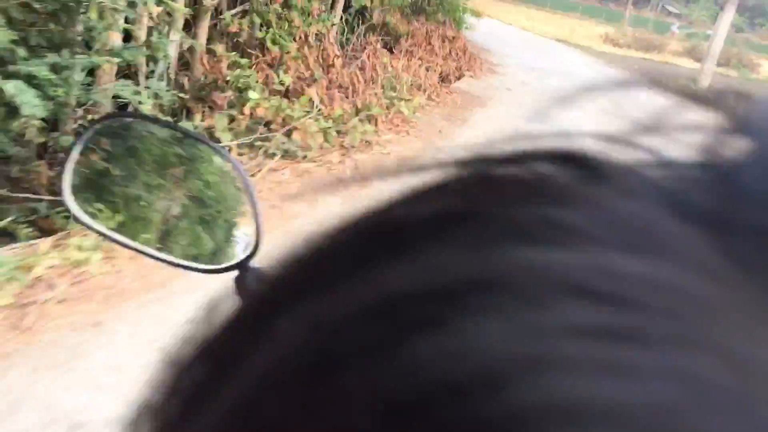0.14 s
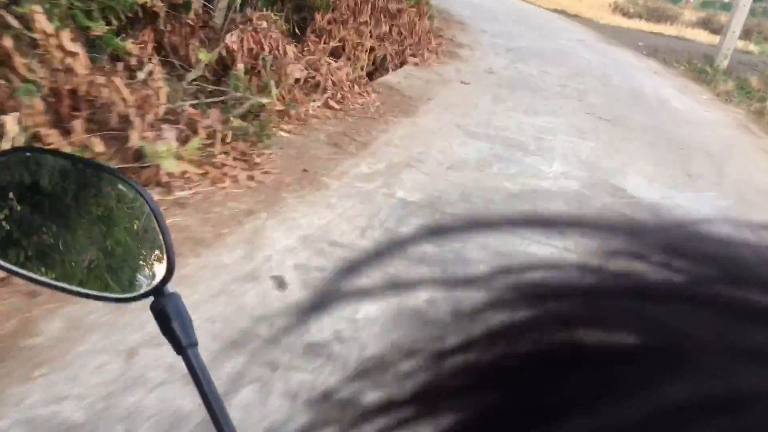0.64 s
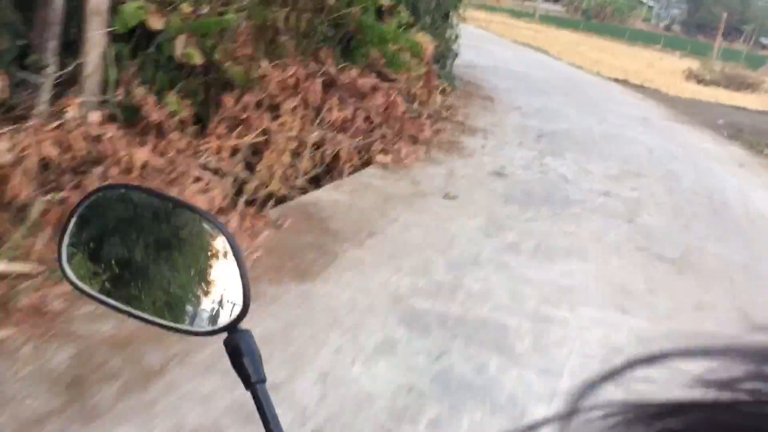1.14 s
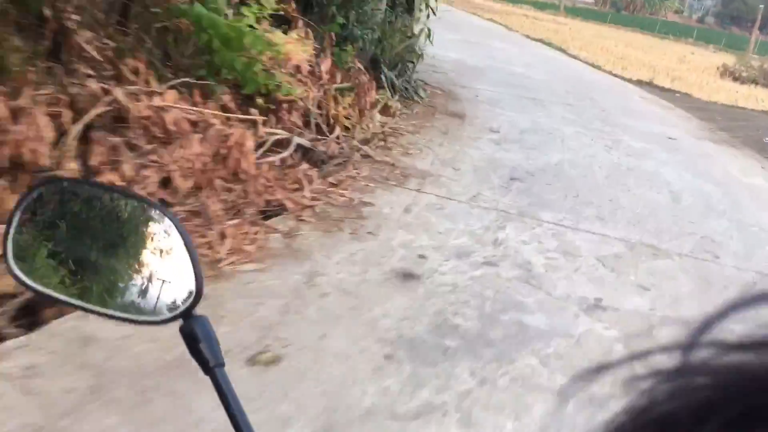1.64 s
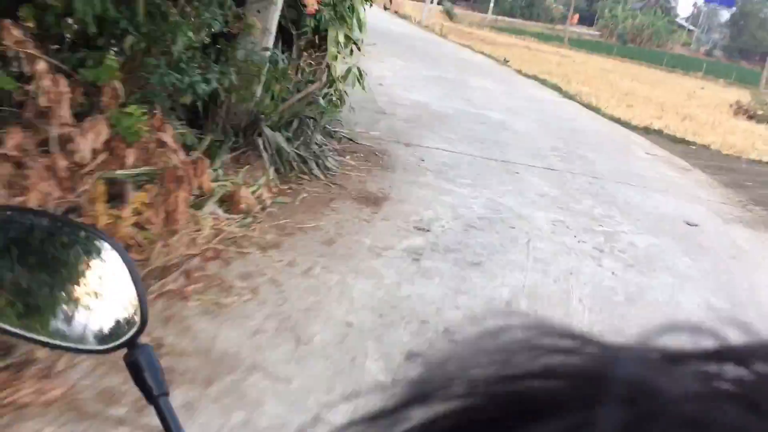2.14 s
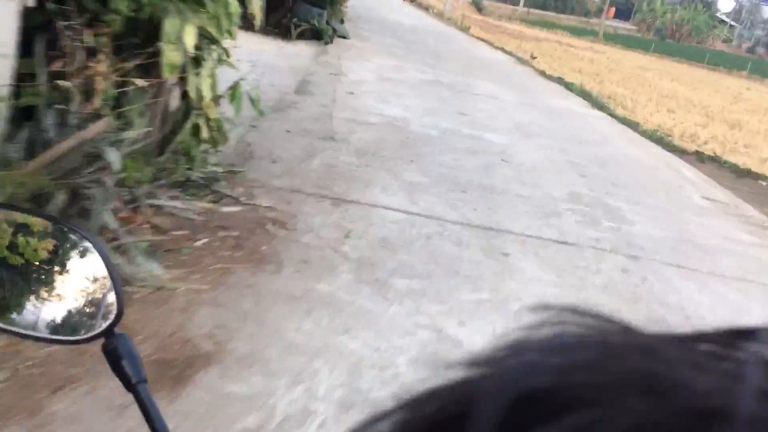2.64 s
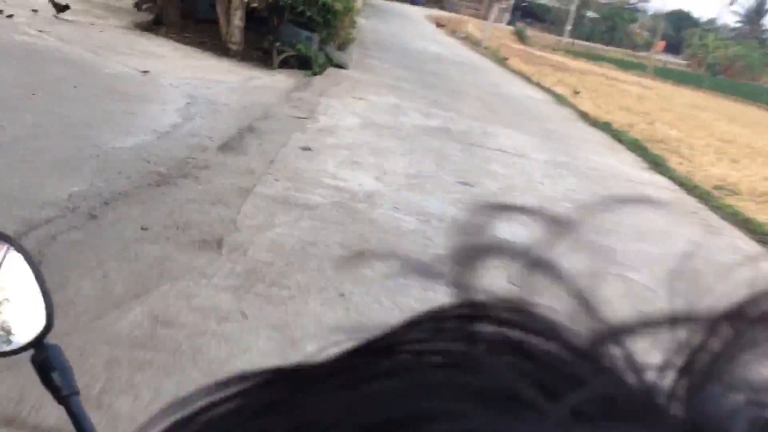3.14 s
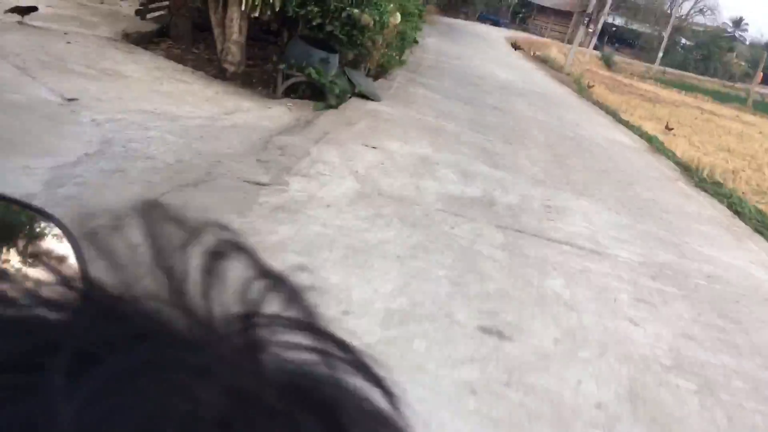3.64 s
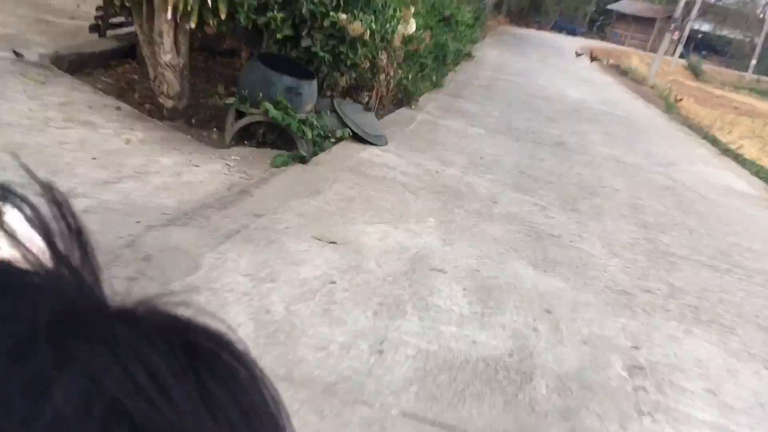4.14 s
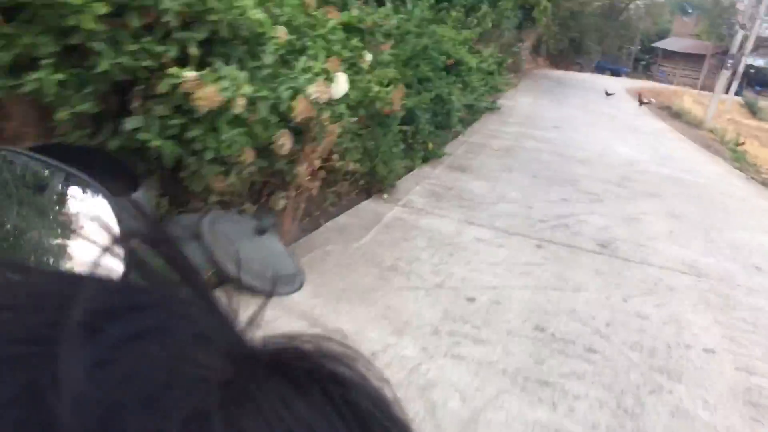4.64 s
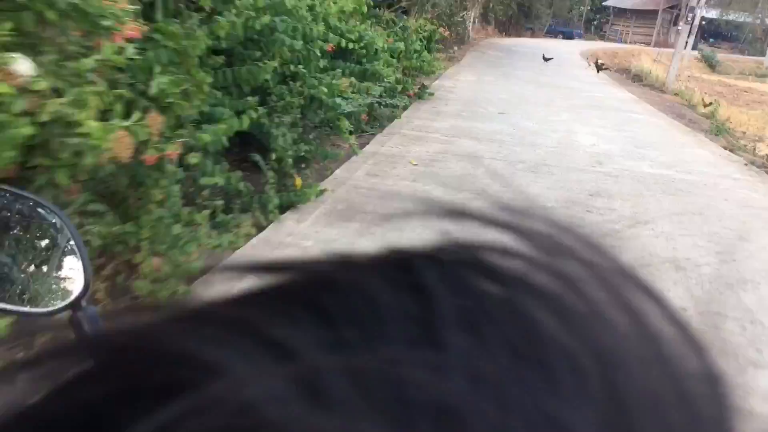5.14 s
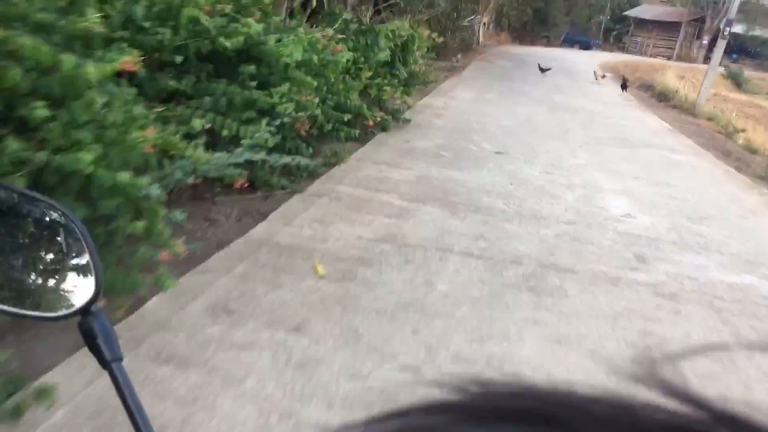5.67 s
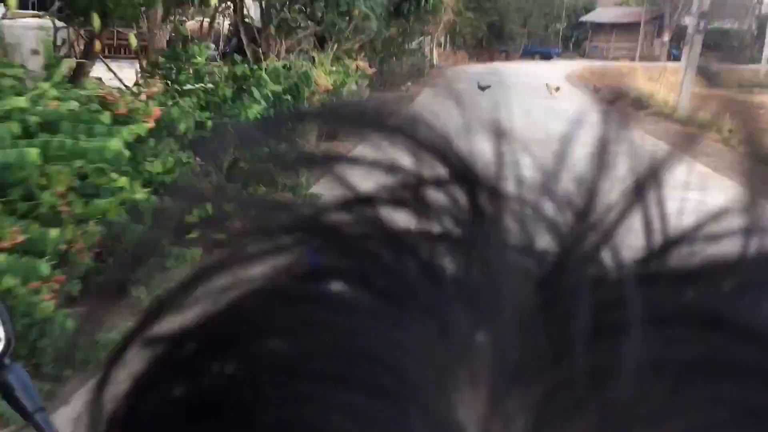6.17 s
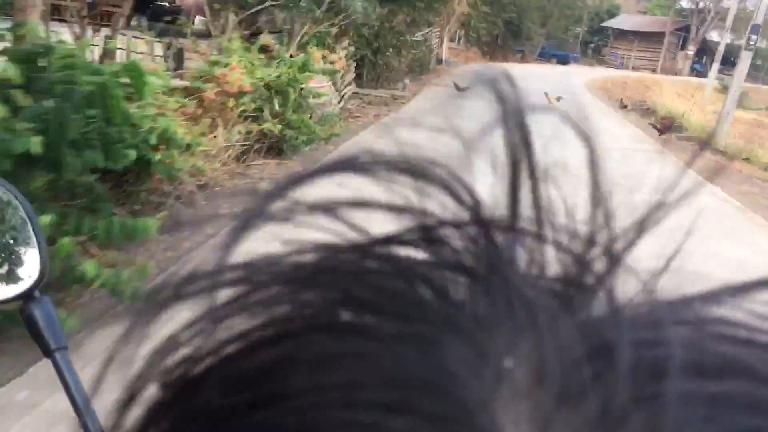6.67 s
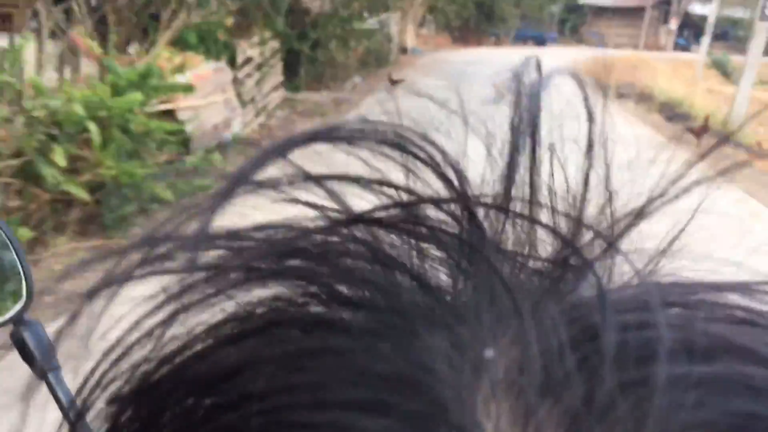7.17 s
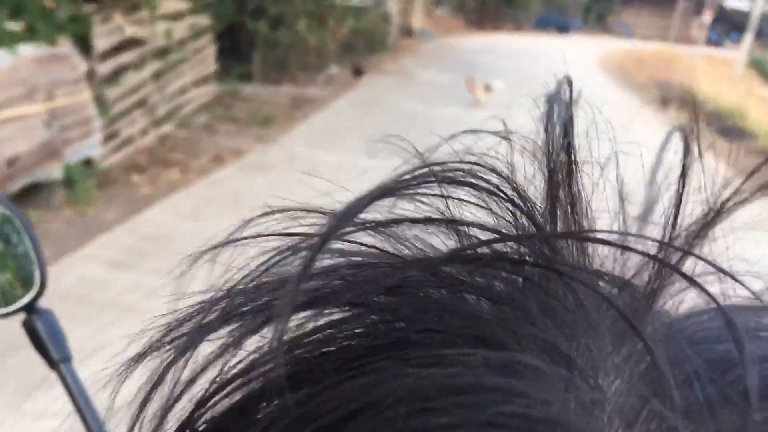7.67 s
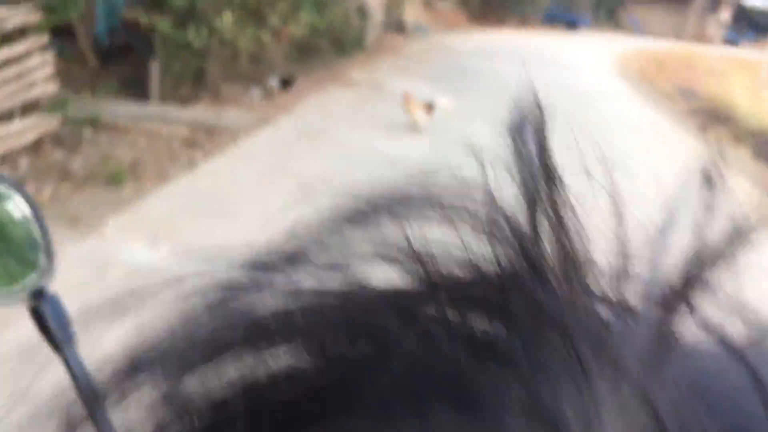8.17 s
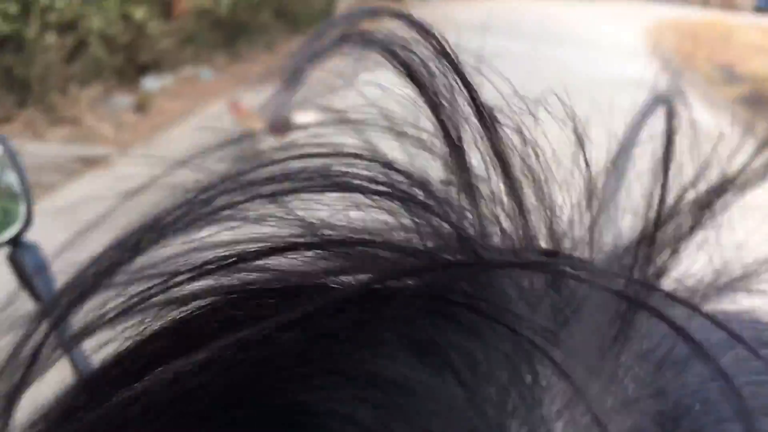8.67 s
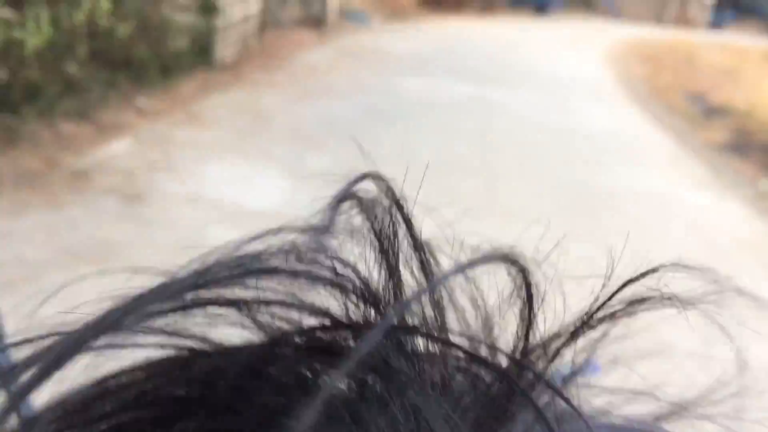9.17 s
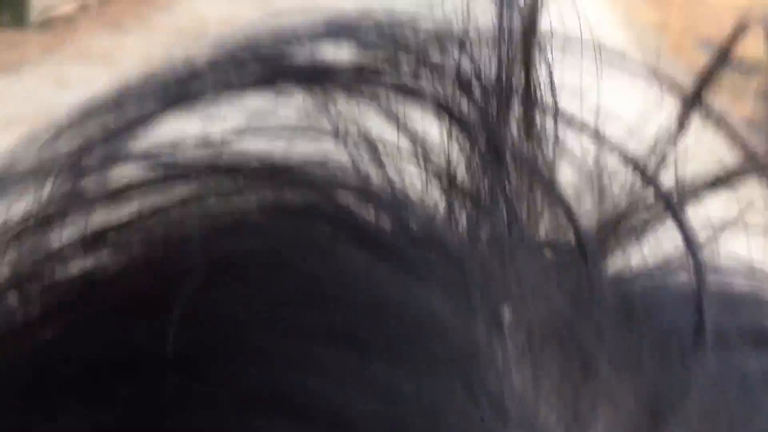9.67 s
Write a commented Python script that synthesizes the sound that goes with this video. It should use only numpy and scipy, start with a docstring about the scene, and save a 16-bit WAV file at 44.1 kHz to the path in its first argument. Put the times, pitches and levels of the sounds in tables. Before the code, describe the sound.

A close outdoor ride on a rural concrete lane: a soft, bassy single-cylinder putter runs throughout over rough airy hiss. Low wind flutters on the microphone, strong at first, calmer, then gusty again. Metallic ticks cluster between three and five seconds, scattered grit clacks follow, and thin raspy bird whistles appear in the last third. The engine never stops or revs.

```python
"""On a concrete lane beside a hedge, a small single-cylinder four-stroke motorcycle rolls slowly, heard
from the saddle. The exhaust is a sum of harmonics of the firing rate; gear and vane whine follows the crank.
Tyre and engine hiss is shaped noise thrown back by the hedge; a loose part and a grit-struck mudguard
ring as decaying modes. Wind is band-limited noise at the microphone; small birds are gliding tones."""
import sys
import numpy as np
from scipy import signal
from scipy.io import wavfile
from scipy.ndimage import uniform_filter1d

SR = 44100
rng = np.random.default_rng(int(sys.argv[2]) if len(sys.argv) > 2 else 0)


def bounce(signal):
    """Save signal as a 16-bit WAV file at the path given by the first command-line argument."""
    frames = np.transpose(np.atleast_2d(signal))
    limited = np.clip(frames, -1, 1)
    pcm = np.round(limited * 32767).astype(np.int16)
    wavfile.write(sys.argv[1], SR, pcm)


def attenuation_scalar(level_db):
    """Turn a level in dB into a linear amplitude multiplier (20 dB per decade)."""
    decades = np.asarray(level_db, float) / 20
    return 10 ** decades


N = 432621
TIME = np.arange(N) / SR
MEAN_FIRING_HZ = 32  # reference rate for the speed-dependent levels


def curve(rows):
    """Linear interpolation: each column joined by straight lines in time."""
    s, *columns = np.transpose(rows)
    return [np.interp(TIME, s, c) for c in columns]


def humps(rows):
    """Superposition of raised-cosine humps (peak time, length, heights); one sum for each height column."""
    rise = 0.4  # share of the length spent before the peak
    s, length, *heights = np.transpose(rows)
    t = np.arange(0, N / SR + 0.01, 0.005)
    u = t[:, None] - s
    u = np.where(u < 0, u / rise, u / (1 - rise)) / length
    shape = np.cos(np.pi / 2 * np.clip(u, -1, 1)) ** 2
    return [np.interp(TIME, t, shape @ h) for h in heights]


def evened(x):
    """Normalisation to unit rms."""
    return x / np.sqrt(np.mean(x ** 2) + 1e-20)


def add(mix, s, sound):
    """Superposition: mixes a sound in at s seconds."""
    part = mix[round(s * SR):][:len(sound)]
    part += sound[:len(part)]


def band(x, lo_hz, hi_hz):
    """Band-pass filtering by a Butterworth response."""
    return signal.sosfilt(signal.butter(2, [lo_hz, hi_hz], "bandpass", fs=SR, output="sos"), x)


def beat(cycles, at, depth_db, count):
    """Amplitude modulation: a swell that returns count times in each engine cycle."""
    return attenuation_scalar(depth_db * np.cos(2 * np.pi * count * (cycles - at)))


def rung(modes, soft_s):
    """Modal decay after a blow with an onset time constant of soft_s; peak 1."""
    t = np.arange(2000) / SR
    ring = sum(attenuation_scalar(db - 60 * t / t60) * np.sin(2 * np.pi * hz * t) for hz, db, t60 in modes)
    ring = ring * (1 - np.exp(-t / soft_s))
    return ring / abs(ring).max()


def firing_rate():
    """Engine kinematics: one firing in each four-stroke cycle of two crank turns; returns firings per s."""
    # engine speed: t/s, firing rate f/Hz
    speed = [(0.0, 30.231), (0.6, 31.337), (1.6, 31.668), (1.8, 31.565), (2.6, 31.812), (3.0, 32.089),
             (4.0, 32.475), (4.6, 32.54), (5.0, 32.037), (5.8, 32.762), (6.2, 32.122), (6.6, 32.374),
             (7.4, 31.952), (7.8, 32.055), (8.2, 31.326), (8.4, 31.701), (9.0, 30.917), (9.81, 31.482)]
    return curve(speed)[0]


def exhaust(cycles, firing_hz):
    """Fourier synthesis of firing orders; the pipe lets high ones out first, so each throb sweeps downward."""
    # deep thump, throb, its edge and the silencer's ring: multiple of the firing rate, relative level/dB
    thump_orders = [(1, -21.5), (2, -2.5), (3, -6)]
    throb_orders = [(4, -2), (5, -3.5)]
    edge_orders = [(6, -0.43), (7, -22.5)]
    ring_orders = [(8, -46.5), (9, -46), (10, -42.5), (11, -41.5), (12, -42.5), (13, -47.5), (14, -78.5)]
    # the bass dips briefly: deepest t/s, length/s, thump level change/dB, throb level change/dB
    dips = [(.17, 0.33, -17, -5), (.64, 0.24, -8, -1), (1.2, 0.18, -2, 0), (4.97, 0.65, -6, -.5),
            (6.3, 0.3, -5, 0.5), (6.59, 0.22, -1, -2), (7.0, 0.3, -20, -4.5), (7.33, 0.23, -14, -1),
            (7.61, 0.34, -8, 0.5), (7.96, 0.16, -9, -3.5), (8.2, .18, -1, -2), (8.93, 0.34, -15, -5),
            (9.18, 0.12, -9, -4.5), (9.38, 0.29, -22, -6.5)]
    thump_loss, throb_loss = humps(dips)
    thump_db, throb_db = -23 + thump_loss, -23.5 + throb_loss
    # the edge, relative to the throb, follows 0.42 of its dips and softens as the firing rate rises
    edge_db = -32 + 23.5 - (1 - 0.42) * throb_loss - 1.5 * (firing_hz - MEAN_FIRING_HZ)

    # each burn has its own strength, timing and ring
    whole = np.arange(cycles[-1] + 2)
    draws = rng.standard_normal((len(whole), 3)).T
    strength, slip, ringing = (np.interp(cycles - 0.3, whole, v) for v in draws)
    turn = 2 * np.pi * (cycles + 0.0045 * slip)

    def swept(orders):
        """Phase dispersion: a phase quadratic in order, so the higher orders arrive earlier."""
        return sum(attenuation_scalar(db) * np.cos(k * turn + 0.35 * (k - 2.6) ** 2 - 0.15) for k, db in orders)

    thump = attenuation_scalar(thump_db + 0.6 * strength) * swept(thump_orders)
    throb = attenuation_scalar(throb_db + 0.37 * strength) * (swept(throb_orders) + attenuation_scalar(edge_db) * swept(edge_orders))
    ring = sum(attenuation_scalar(db) * np.cos(k * turn + 3.9 + 1.75 * (k - 11)) for k, db in ring_orders)
    ring = ring * attenuation_scalar(throb_loss + 2.1 * strength + ringing)
    return np.sqrt(2) * (thump + throb + ring)


def whine(cycles):
    """Order-locked tones: teeth and vanes whine at multiples of the firing rate, each wavering on its own."""
    # multiples of the firing rate
    orders = [16, 17, 20, 24, 34, 36]
    # each order: mid-ride level/dB, drift/(dB per s)
    order_levels = [(-61, -0.5), (-58, 0.9), (-55, 0.8), (-54.5, 0.37), (-53, -0.7), (-53.5, 0)]
    waver = rng.standard_normal((len(orders), N // 1000 + 2))
    waver = evened(uniform_filter1d(waver, 7, 1))
    out = np.zeros(N)
    for k, (db, drift), w in zip(orders, order_levels, waver):
        w = np.interp(TIME, np.arange(len(w)) * 1000 / SR, w)
        level_db = db + drift * (TIME - TIME.mean()) + 4 * w
        phase = 2 * np.pi * (k * cycles + 0.12 * w + rng.random())
        out += attenuation_scalar(level_db) * np.sqrt(2) * np.sin(phase)
    return out


def hiss(cycles, firing_hz):
    """Spectrally shaped noise; the lowest band puffs with each firing, the treble with each crank turn."""
    # spectrum of engine and tyre noise: f/Hz, relative density level/dB
    spectrum = [(30, -27), (150, -11), (240, -5.5), (500, -4.5), (720, -9.5), (870, -18), (1300, -11.5),
                (1900, -20), (3000, -24), (4400, -27), (5000, -32.5), (6000, -31.5), (7600, -39.5),
                (9000, -37), (10400, -42), (12000, -40), (15700, -47)]
    # its resonances: centre f/Hz, width/Hz, rise level/dB
    resonances = [(346.3, 31, 8.74), (980, 150, 4.7), (1685, 240, 3.2), (2376, 89, 3.5), (800, 13, 0.5)]
    # treble returned by the hedge, weighted below for each layer: t/s, relative level/dB
    hedge_return = [(0, -1), (1.2, 0), (3.1, 3), (3.45, -2), (4.05, -3), (4.42, -4.5), (4.83, 2), (5.4, 4),
                    (6.32, 1.5), (6.69, 3.5), (7.58, -2), (8.32, 1.5), (8.5, 0), (9.25, 1), (9.5, 0.5),
                    (9.81, -1)]
    frames, hz = N // 256 + 5, np.fft.rfftfreq(1024, 1 / SR)
    real, imaginary, patches = rng.standard_normal((frames, 513, 3)).T
    patches = uniform_filter1d(patches, 14, 0)  # along frequency
    patches = evened(uniform_filter1d(patches, 10, 1))  # along time
    f, db = np.transpose(spectrum)
    colour = np.interp(np.log(hz + 1), np.log(f), db)
    colour = colour + sum(d / (1 + ((hz - c) / w * 2) ** 2) for c, w, d in resonances)
    z = (real + 1j * imaginary) * attenuation_scalar(colour[:, None] + 0.98 * patches)

    def layer(lo_hz, hi_hz):
        """Inverse Fourier synthesis of one frequency band."""
        inside = (hz >= lo_hz) & (hz < hi_hz)
        return signal.istft(z * inside[:, None], nperseg=1024, noverlap=768)[1][:N]

    z /= np.sqrt(np.mean(layer(450, 1800) ** 2))
    puff, drone, body = layer(0, 450), layer(450, 900), layer(900, 1800)
    upper, top = layer(1800, 5000), layer(5000, SR)
    body = body + drone * attenuation_scalar(1.5 * (firing_hz - MEAN_FIRING_HZ))  # the drone grows with the firing rate
    hedge_db = curve(hedge_return)[0]
    flutter = evened(band(rng.standard_normal(N), 3.4, 10.8))  # uneven concrete shakes the treble
    treble = upper * attenuation_scalar(0.22 * hedge_db) + top * attenuation_scalar(0.79 * hedge_db)
    treble *= beat(cycles, 0.26, 0.93, count=2) * attenuation_scalar(0.55 * flutter)
    puff = puff * beat(cycles, 0.85, 0.57, count=1)
    body = body * beat(cycles, 0.31, 0.26, count=2)
    return attenuation_scalar(-36.5) * (puff + body + treble)


def loose_part(cycles):
    """Impulse excitation of modes: hard ticks, and weaker ones that every crank turn shakes out unevenly."""
    # hard ticks: t/s, peak level/dB
    ticks = [(2.4488, -26), (3.0928, -26), (3.3043, -29), (3.3717, -28), (3.435, -26.5), (3.5896, -27),
             (3.8535, -25.5), (4.0077, -25), (4.0197, -24), (4.0511, -27), (4.0975, -25), (4.127, -25),
             (4.145, -24), (4.2217, -29), (4.3295, -24), (4.3609, -28), (4.515, -29), (4.62, -25),
             (4.6533, -29), (4.6977, -29), (4.7141, -25.5), (4.822, -25.5)]
    # how freely the part rattles: t/s, level/dB before the uneven shaking
    slack = [(0, -40), (2.3, -42), (3.1, -40), (3.6, -43), (4.1, -37), (4.75, -43), (5.1, -40),
             (5.6, -42.5), (9.81, -40.5)]
    # what the part rings with: f/Hz, relative level/dB, t60/s
    part_modes = [(2214, -0.5, 0.017), (2365, -3.5, 0.012), (1570, -5, 0.019), (4200, -17.5, 0.018)]
    blows = np.zeros(N)
    turns = np.flatnonzero(np.diff(np.floor(2 * (cycles - 0.27))))
    # after a hard tick the part keeps chattering, dying away
    s, db = np.transpose(ticks)
    since = TIME[turns, None] - s
    chatter = attenuation_scalar(db - 1) * np.exp(-abs(since) / 0.028) * (since > 0)
    uneven = attenuation_scalar(3.5 * rng.standard_normal(len(turns)))
    blows[turns] = np.maximum(attenuation_scalar(curve(slack)[0][turns]), chatter.max(1)) * uneven
    for s, db in ticks:
        at = round(s * SR)
        blows[at - 200:at + 200] = 0  # a hard tick replaces any other blow close to it
        blows[at] = attenuation_scalar(db)
    return signal.oaconvolve(blows, rung(part_modes, 0.0016))[:N]


def grit():
    """Impact excitation: stones crunch on the mudguard's modes and crack brightly; small ones fall at random."""
    # stones under the tyres: t/s, knock level/dB, crack level/dB
    stones = [(1.4501, -38, -53), (2.4188, -28, -51), (2.6228, -22, -37), (3.094, -26.5, -43),
              (3.9908, -26, -49), (4.6204, -25, -46), (5.673, -32, -53), (5.933, -21.5, -41),
              (5.9464, -23, -47), (7.0494, -40, -48), (8.2694, -32, -54), (8.8228, -22.5, -53),
              (8.8794, -29, -42), (8.9094, -36, -46), (8.9435, -23.5, -52), (9.1294, -42, -50),
              (9.226, -35, -43), (9.2744, -41, -43)]
    # modes of the mudguard: f/Hz, relative level/dB, t60/s
    guard_modes = [(1050, 10, 0.01), (1595, 9, 0.022), (2150, 9, 0.0094), (3160, 2.5, 0.0096),
                   (3980, -4, 0.031)]
    out, t = np.zeros(N), np.arange(1200) / SR
    noises = rng.standard_normal((len(stones), 3, len(t)))
    for (s, knock_db, crack_db), (crunch, dull, bright) in zip(stones, noises):
        crunch = np.r_[10, crunch[1:]] * attenuation_scalar(-60 * t / 0.035)  # one hard blow, then crunching
        knock = signal.oaconvolve(crunch, rung(guard_modes, 0.0002))[:len(t)]
        thud = 0.33 * attenuation_scalar(-60 * t / 0.045) * evened(band(dull, 900, 3800))
        knock = knock / abs(knock).max() + thud
        crack = attenuation_scalar(crack_db - 60 * t / 0.02) * evened(band(bright, 4500, 12000))
        add(out, s, attenuation_scalar(knock_db) * knock + crack)
    falls = rng.random(N) < 35 / SR  # about 35 small stones per s
    small = falls * attenuation_scalar(-60.5 + 4.2 * np.minimum(rng.exponential(1, N), 3))
    small = signal.lfilter([1], [1, -np.exp(-1 / (0.00092 * SR))], small)  # decay time constant 0.92 ms
    return out + band(small * rng.standard_normal(N), 900, 7000)


def wind(cycles):
    """Band-limited lumpy noise at the microphone; its upper layer swells once in each engine cycle."""
    # wind before gusts and sway: t/s, level/dB
    wind_level = [(0, -35.5), (1.4, -39), (2.4, -40), (3.4, -37), (3.8, -41), (4.5, -39), (5.1, -29.5),
                  (5.9, -45), (6.2, -34.5), (7.3, -31), (7.65, -36), (8.4, -32.5), (9.0, -33.5),
                  (9.81, -34.5)]
    # stronger gusts: peak t/s, length/s, rise level/dB
    gusts = [(.07, 0.22, 16.5), (5.04, .3, 5), (6.58, .28, 8), (7.84, 0.42, 0), (8.54, .28, 4.5),
             (9.1, 0.34, 2)]
    # single gust pops: t/s, peak level/dB
    pops = [(7.224, -11.5), (8.833, -17)]
    deep, upper, lumps, *slow = rng.standard_normal((5, N))
    sway, upper_sway = (2.5 * evened(band(v, 0.67, 2.8)) for v in slow)  # slow random swings, dB
    level_db = curve(wind_level)[0] + humps(gusts)[0] + sway
    lumps_db = 5 * evened(band(lumps, 14.8, 28.6))
    deep = evened(band(band(deep, 40.5, 98.5), 41.5, 137))
    upper = band(upper, 128, 225)
    upper = evened(band(upper, 86, 215) * beat(cycles, 0.86, 4.3, count=1))
    out = attenuation_scalar(level_db + lumps_db) * (deep + attenuation_scalar(-2.5 + upper_sway) * upper)
    u = np.arange(0, 1, 1 / (0.0387 * SR))  # progress through a pop of 38.7 ms
    for s, db in pops:
        add(out, s, attenuation_scalar(db) * np.hanning(len(u)) * np.sin(2 * np.pi * 2.53 * u))
    return out


def birds():
    """Frequency modulation: raspy gliding whistles, smeared by scattered echoes off the road and fence."""
    # chirps: t/s, length/s, start f/Hz, end f/Hz, level/dB
    chirps = [(6.36, .05, 5500, 5450, -57), (6.557, 0.092, 5850, 6030, -52),
              (6.647, 0.033, 4600, 4300, -48), (6.887, 0.042, 6030, 6040, -51),
              (6.958, 0.05, 4540, 3900, -49), (7.605, 0.065, 5600, 6130, -51),
              (7.658, 0.092, 6120, 5750, -50), (7.717, 0.034, 4950, 4450, -46),
              (7.726, 0.037, 4300, 3300, -49), (8.502, .07, 5100, 3900, -51),
              (8.563, 0.051, 4630, 3250, -43), (8.69, .04, 5350, 5200, -52), (8.76, 0.025, 5300, 5100, -51),
              (8.771, 0.054, 4470, 3730, -47), (8.83, 0.036, 4310, 3400, -46), (8.987, .1, 5600, 4680, -53),
              (9.037, 0.054, 4440, 3770, -43), (9.05, .05, 5800, 5550, -56), (9.076, .08, 4500, 3740, -47),
              (9.13, .03, 3920, 3050, -46), (9.25, .03, 4400, 4280, -52), (9.3, 0.076, 5600, 5700, -59),
              (9.384, 0.038, 4270, 3860, -44), (9.518, .06, 4800, 4200, -52), (9.6, 0.11, 5430, 5650, -58),
              (9.69, .04, 5450, 5700, -56), (8.36, .03, 5350, 5300, -54), (9.691, 0.066, 4450, 3820, -47.5)]
    out = np.zeros(N)
    for s, length, start_hz, end_hz, db in chirps:
        u = np.arange(0, 1, 1 / (length * SR))
        rasp, tremor = evened(uniform_filter1d(rng.standard_normal((2, len(u))), 110, 1))
        hz = start_hz + (end_hz - start_hz) * u ** 1.2 + 85 * rasp
        envelope = attenuation_scalar(db + 0.9 * tremor) * np.sin(np.pi * u) ** 0.92
        add(out, s, envelope * np.sin(2 * np.pi * np.cumsum(hz) / SR))
    t = np.arange(4000) / SR
    sparse = rng.random(len(t)) < 0.02
    echoes = rng.standard_normal(len(t)) * sparse * attenuation_scalar(-9 - 60 * t / 0.17)
    echoes[0] = 1  # direct sound
    return signal.oaconvolve(out, echoes)[:N]


def scene():
    """Linear superposition of all sources at one microphone."""
    firing_hz = firing_rate()
    cycles = 0.39 + np.cumsum(firing_hz) / SR  # engine cycles gone by
    engine = exhaust(cycles, firing_hz) + whine(cycles) + loose_part(cycles)
    return (engine + hiss(cycles, firing_hz) + grit() + wind(cycles) + birds())[None]


def top_cut(x):
    """Nothing passes above the cut-off."""
    return signal.sosfilt(signal.butter(12, 15730, fs=SR, output="sos"), x)


def record(dry):
    """First-order high-pass response: the microphone drops the deepest bass."""
    mix = signal.sosfilt(signal.butter(1, 8, "highpass", fs=SR, output="sos"), dry)
    return top_cut(mix)


dry = scene()
out = record(dry)
bounce(out)
```